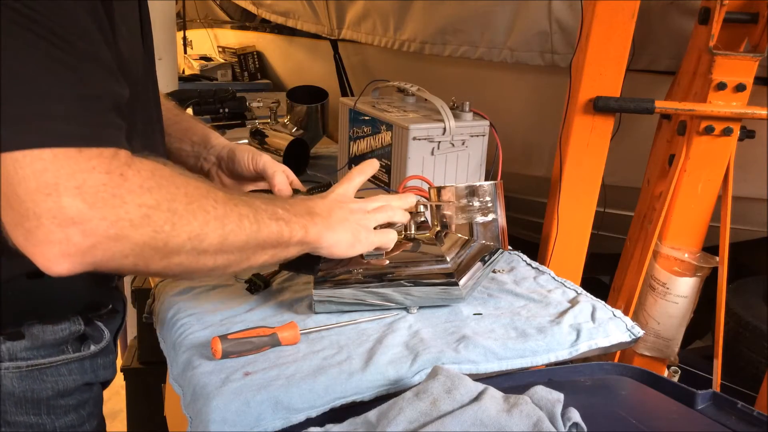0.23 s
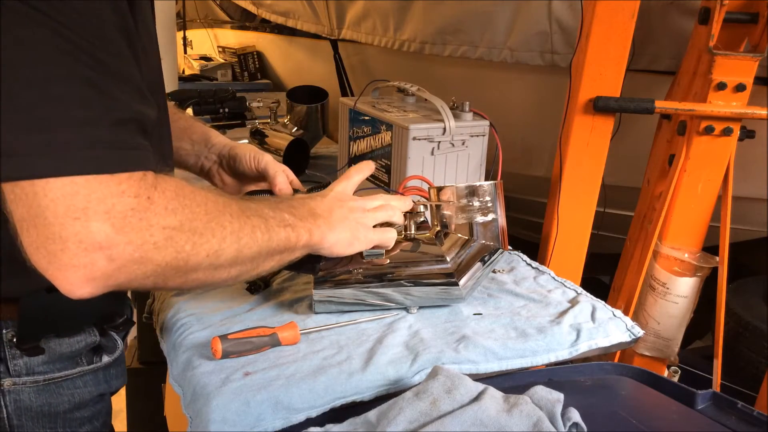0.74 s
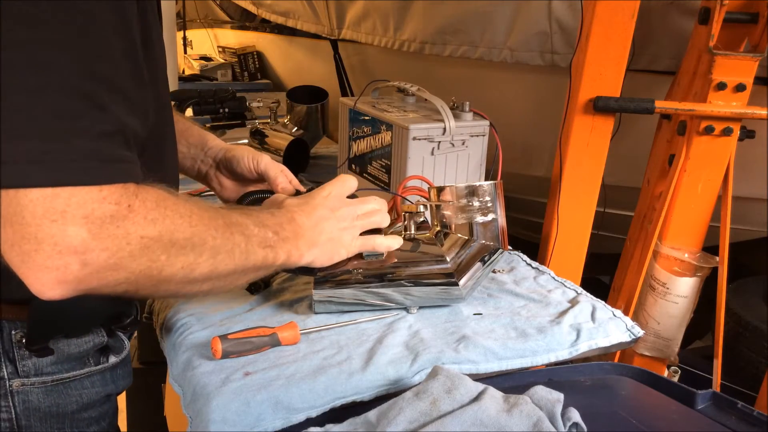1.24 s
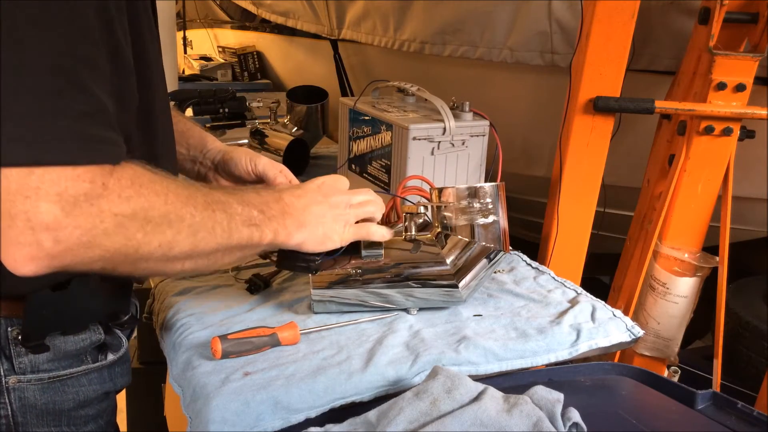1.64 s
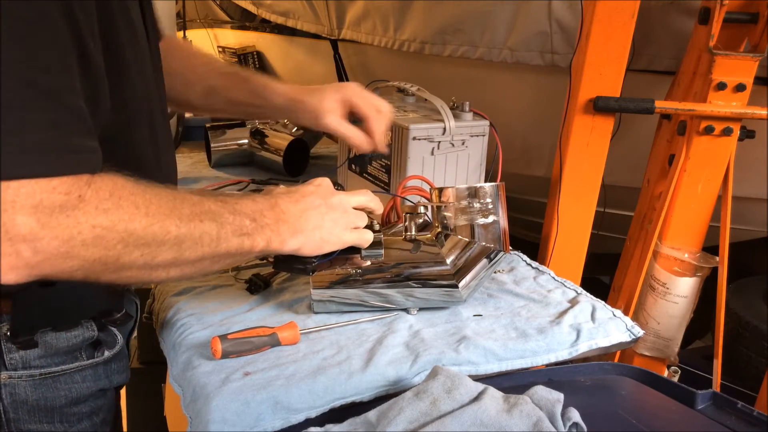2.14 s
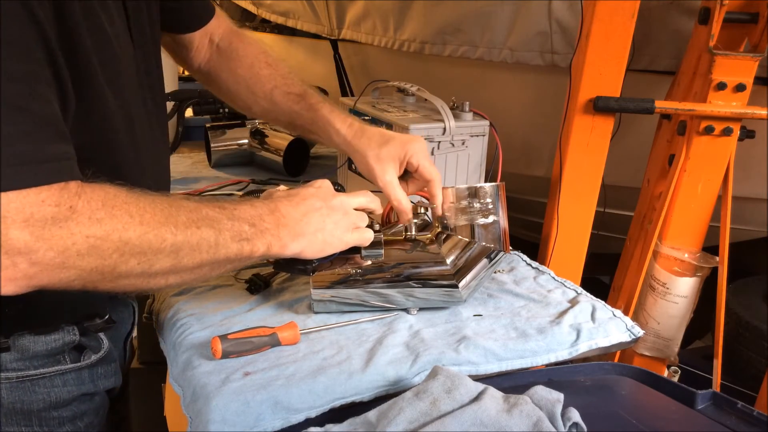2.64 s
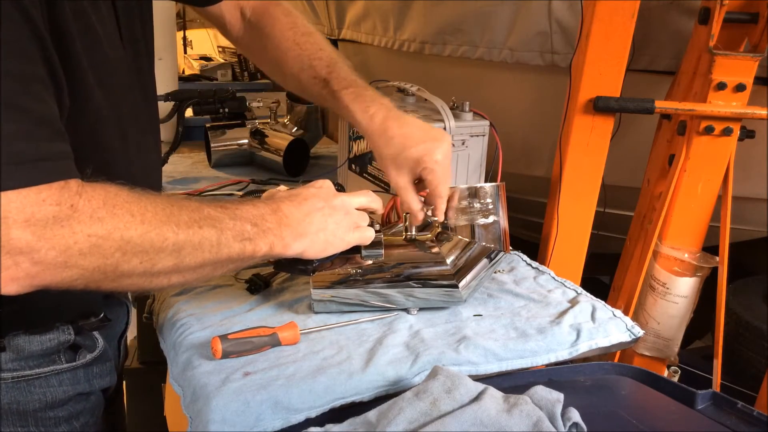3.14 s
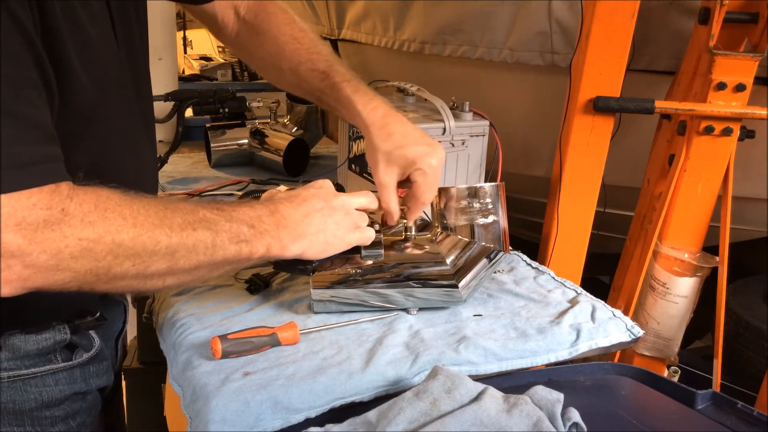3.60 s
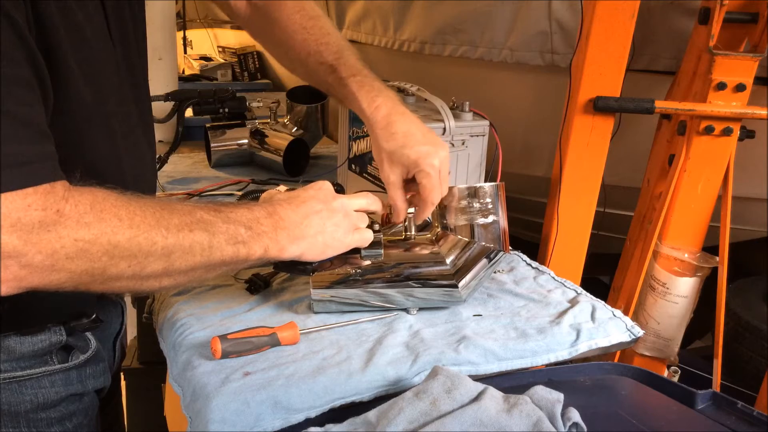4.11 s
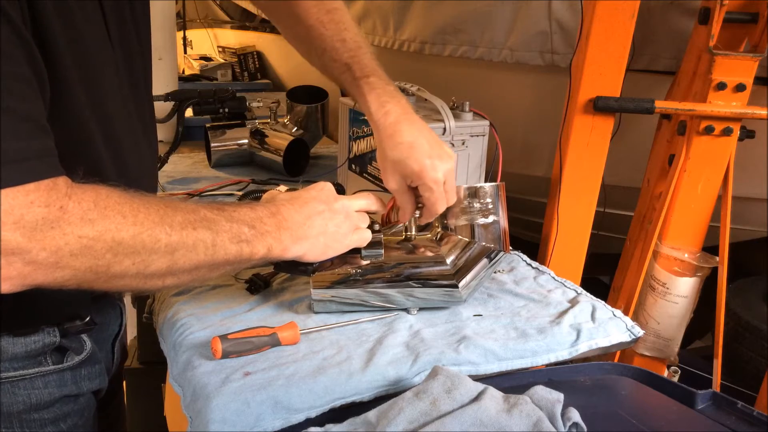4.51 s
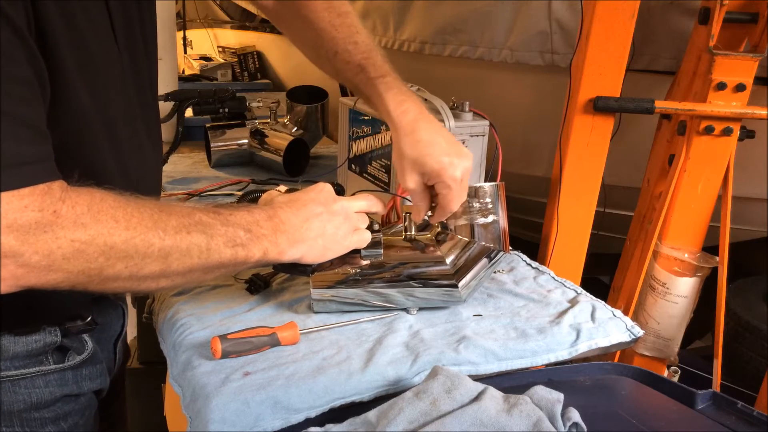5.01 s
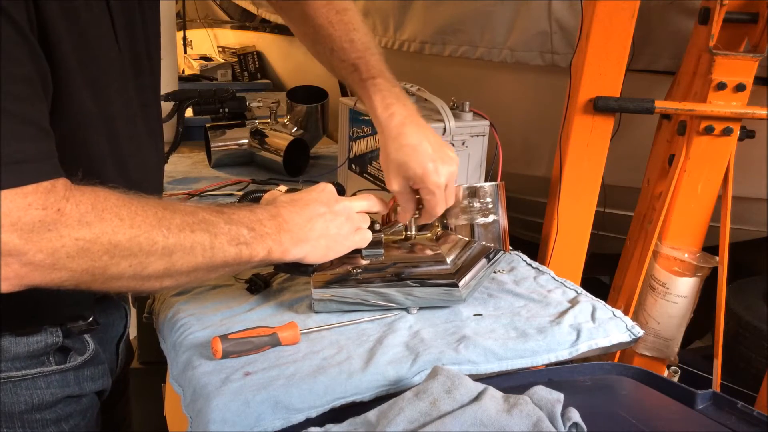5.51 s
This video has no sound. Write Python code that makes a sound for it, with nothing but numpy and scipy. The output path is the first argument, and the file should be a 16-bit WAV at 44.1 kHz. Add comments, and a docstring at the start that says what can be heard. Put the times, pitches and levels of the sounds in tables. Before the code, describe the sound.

A bright steel clip snaps and rings over a steady low fan hum, followed by dull metal knocks, tiny ticks and a late clack.

```python
"""First the steady hum and air rush of a fan motor in a small, cluttered shop, then light finger ticks.
At the workbench, straight ahead of the stereo microphones, a steel retaining clip snaps free and rings;
a part knocks twice on a metal valve housing, skin rubs faintly, and a fitting clacks into its seat.
Blows are noise bursts with a short echo plus decaying modes; rubs and air are coloured noise;
the hum is a 120 Hz mains tone with sine orders of the fan shaft, spread over left and right."""
import sys
import numpy as np
from scipy import signal
from scipy.fft import rfft, irfft
from scipy.io import wavfile

SR = 44100
rng = np.random.default_rng(int(sys.argv[2]) if len(sys.argv) > 2 else 0)


def put_to_file(sound):
    """Save the sound as 16-bit audio at rate SR, in the file named by the first command-line argument."""
    columns = np.atleast_2d(sound).T  # one column per channel
    safe = np.clip(columns, -1, 1)
    whole_steps = np.round(safe * 32767)
    wavfile.write(sys.argv[1], SR, whole_steps.astype(np.int16))


N = 253575  # length in samples
HIT_T = np.arange(SR // 2) / SR  # t/s since a blow
EARS = np.array([[.5], [-.5]])  # splits a left-minus-right difference over left and right

# Clip springing free and landing: t/s, level/dB, share that sets it ringing (0-1)
CLIP_HITS = [(0.3540, -17.5, 1), (0.3571, -24.5, 0), (0.3628, -27, 0.2)]
CLIP_MODES = [(1427, -37, .24), (2422, -33, .32), (2902, -46, .15), (3741, -27, .25), (4290, -45, .2),
              (4760, -38, .11), (5172, -37, .19), (5266, -29, .21), (5447, -26.5, .22), (6035, -39, .16),
              (7145, -29, .19), (7351, -37, .16), (7394, -21, .195), (7470, -37, .14), (8655, -27, .15),
              (8790, -37, .14), (9556, -27, .11), (9636, -22, .125), (9700, -17, .02), (10400, -39, .13),
              (10820, -40, .13), (11390, -41, .14), (12090, -32, .1), (12210, -33, .12), (12860, -32, .13),
              (13440, -39, .11), (14010, -40, .12), (14160, -39, .12), (14909, -33, .145)]
SNAP_COLOUR = [(500, -8.5), (1000, -22.5), (1330, 2), (1800, -15), (3200, -11), (3750, 7), (4250, -8.5),
               (5400, 4), (6400, -3), (9600, 4), (10800, -6), (12200, 5.5), (15000, -7), (15500, -57)]
CLIP_SCATTER = .45  # how strongly reflections make the ringing swell and dip (0-1)

# Touches (KNOCK_HITS, CLACK_HITS, TICK_HITS), columns: t/s, level/dB, brightness/dB per octave,
# ring level/dB relative to the loudest contact, number of contacts, change/dB per contact
# Dull knocks of a part on the housing: columns as above
KNOCK_HITS = [(1.4446, -33.5, 0, 3, 3, -1.5), (1.9016, -38.5, -1.9, -0.5, 3, -1)]
# Spectrum of a knock: f/Hz, density/dB per Hz
KNOCK_COLOUR = [(200, -11), (600, -4.5), (950, 4), (1400, -4.5), (2000, -7), (2520, -0.5), (3080, -10.5),
                (3750, -5.5), (4700, -14), (6100, -31), (7500, -8.5), (9000, -29), (10900, -20.5),
                (15000, -36)]
# Ringing modes of the housing: f/Hz, level/dB relative to the blow, T60/s
HOUSING_MODES = [(1025, -20, 0.33), (1350, -10.5, 0.17), (2330, -18, .13), (2454, -3, 0.073),
                 (2870, -25, 0.14), (3750, -10.5, 0.18), (4340, -24, 0.22)]
KNOCK_GAP_S, KNOCK_STRETCH = .0027, 2.1  # the part rocks: first gap between contacts, growth of the gaps

# Fitting scraping into its seat: columns as above
CLACK_HITS = [(4.823, -33, 1, 2, 4, -0.8)]
# Spectrum of the clack: f/Hz, density/dB per Hz
CLACK_COLOUR = [(200, -4), (480, 5), (950, -0.5), (1500, 5), (2200, -4), (3150, -1), (3800, -5.5),
                (5200, -5), (6000, -6.5), (8400, -8.5), (11000, -14), (14900, -26), (15500, -38)]
# Ringing modes of the fitting: f/Hz, level/dB relative to the blow, T60/s
FITTING_MODES = [(485, -7, 0.18), (3070, -8, 0.098), (3720, -23, 0.26), (4350, -19, .1), (4850, -17, 0.098),
                 (5350, -13, 0.12), (8032, -22, .1), (8320, -14, 0.14), (9360, -19, 0.13)]
CLACK_GAP_S, CLACK_STRETCH = .0019, 1.65  # it catches ever more slowly as it tightens

# Light ticks of small parts between the fingers: columns as above
TICK_HITS = [(0.2946, -43.5, 0.5, -2, 3, -4), (0.3235, -46, -2, 0, 3, -2), (2.8885, -48, 2, 6, 1, 0),
             (2.9203, -43, -2, 0, 3, -3.5), (3.0489, -48, -1.5, -2, 1, 0), (3.3007, -57.5, -3, 2, 4, 3),
             (3.3345, -50, -3.5, -3, 1, 0), (4.0210, -53, -5.5, 4, 1, 0), (4.0872, -52.5, -5.5, 4, 1, 0),
             (4.3480, -54, -2, 3.5, 2, 7), (4.4025, -52, 1, 4, 1, 0), (4.4186, -48.5, 2, 5, 1, 0)]
# Spectrum of a tick: f/Hz, density/dB per Hz
TICK_COLOUR = [(800, -6.5), (2200, 0.5), (3150, -1.5), (4100, -6), (5200, -2), (6250, 1.5), (7600, -6),
               (9000, -8), (11500, -11), (14000, -6), (14900, 2), (15500, -14)]
# Ringing modes of the small parts: f/Hz, level/dB relative to the blow, T60/s
TICK_MODES = [(3125, -11.5, 0.081), (3380, -12.5, 0.044), (6280, -6, 0.031), (14850, -18, .04)]
TICK_GAP_S, TICK_STRETCH = .008, .97  # a part slips under a fingertip: first gap, change of the gaps

# Fingertips sliding over metal: middle t/s, length/s, level/dB
RUB_STROKES = [(2.50, .25, -72), (2.74, .2, -73), (3.39, .08, -68), (5.23, .2, -66.5)]
# Spectrum of the rubbing: f/Hz, density/dB per Hz
RUB_COLOUR = [(1500, -13), (4000, -5), (7500, 0), (11000, -15), (15000, -6)]

# Echo decay of the shop: f/Hz, T60/s
SHOP_T60 = [(400, 0.26), (1500, 0.26), (4000, 0.21), (8000, 0.18), (15000, 0.18)]

FAN_HZ, MAINS_HZ = 45.67, 120  # shaft rate, mains hum
# Shaft orders of the fan: multiple of the shaft rate, level/dB rms, left minus right/dB, left lead/rad
FAN_ORDERS = [(1, -56.5, -4.5, -0.42), (3, -51.5, -2, 0.2), (4, -59, -4, 0.43), (5, -58.5, -1.5, 0.36),
              (7, -53, 5.5, 0.34)]
# Spectrum of the fan's air, before its peaks: f/Hz, density/dB per Hz
AIR_COLOUR = [(15, -4.5), (30, 2.5), (65, -4.5), (130, -3), (400, -4.5), (570, -3.5), (820, -11.5),
              (1150, -7), (1600, -16.5), (1900, -14.5), (2500, -21.5), (3700, -29), (8000, -31.5),
              (15000, -35.5)]
AIR_DB = -46.5  # rms level over both channels
# Narrow resonances in the air, a negative rise being a dip: f/Hz, width/Hz, rise/dB
AIR_PEAKS = [(568, 75, 5), (1225, 33, -2.5), (1449, 6.9, 15), (1796, 50, 9), (2056, 40, 0.5),
             (2623, 12, 14), (2965, 16, 7.5), (4340, 16, 15), (4910, 510, 4)]
# Likeness of the air at the left and right microphone: f/Hz, likeness (0-1)
AIR_SAME = [(60, 0.75), (130, 1), (290, 0.55), (520, 1), (700, 0.95), (860, 0.93), (1050, 0.95),
            (1700, 0.72), (2100, 0.62), (2700, 0.58), (3400, 0.079), (15000, .15)]
# Phase by which the left channel leads in the air: f/Hz, lead/rad
AIR_LEAD = [(45, 0.026), (130, 0.69), (340, 0.61), (520, -0.013), (750, 1.2), (1100, 0.48), (1600, 1.07),
            (2000, 0.61), (2700, 1.8), (6000, 1.1)]
# Balance of the air: f/Hz, left minus right/dB
AIR_PAN = [(60, 2.5), (110, -1), (200, 0), (380, 0.5), (700, -0.5), (1290, 1.5), (2380, 0.5), (4400, -1),
           (8120, 0.0), (15000, 0.5)]
EDGE_HZ = 15600  # upper band limit of the recorder


def clip_snap():
    """The spring clip lets go with a bright crack, rebounds and rings."""
    out = np.zeros(N)
    for s, db, share in CLIP_HITS:
        add(out, s, amp(db) * crack(SNAP_COLOUR, 0, t60=0.05, room_db=-10))
        add(out, s, share * ring(CLIP_MODES, CLIP_SCATTER))
    return out


def knocks():
    """A part rocks on the valve housing: dull contacts at widening gaps, and the housing rings."""
    return contacts(KNOCK_HITS, KNOCK_COLOUR, HOUSING_MODES, KNOCK_GAP_S, KNOCK_STRETCH,
                    t60=0.062, room_db=-10)


def clack():
    """A fitting catches in its seat ever more slowly, and each catch strikes it."""
    return contacts(CLACK_HITS, CLACK_COLOUR, FITTING_MODES, CLACK_GAP_S, CLACK_STRETCH,
                    t60=0.036, room_db=-11.5)


def ticks():
    """Small parts slip under the fingertips and catch at nearly even intervals."""
    return contacts(TICK_HITS, TICK_COLOUR, TICK_MODES, TICK_GAP_S, TICK_STRETCH,
                    t60=0.027, room_db=-10.5)


def contacts(rows, colour, modes, gap_s, stretch, t60, room_db):
    """Touches on a hand-damped part: every contact cracks, and the loudest one sets it ringing."""
    out = np.zeros(N)
    for s, db, tilt_db, ring_db, count, step_db in rows:
        delays, changes = chatter(count, step_db, gap_s, stretch)
        for delay, change in zip(delays, changes):
            add(out, s + delay, amp(db + change) * crack(colour, tilt_db, t60, room_db))
        loudest = changes.argmax()
        ringing = ring(tilted(modes, tilt_db), scatter=0.52)
        add(out, s + delays[loudest], amp(db + changes[loudest] + ring_db) * ringing)
    return out


def chatter(count, step_db, gap_s, stretch):
    """One touch breaks into contacts: their delays, gaps scaled by stretch, and steady level steps."""
    k = np.arange(round(count))
    gaps = gap_s * stretch ** k
    return np.cumsum(gaps) - gaps, step_db * k


def crack(colour, tilt_db, t60, room_db):
    """Dense, quickly dying vibration of a struck part, followed by the shop's short echo."""
    near, far = rng.choice([-1, 1], (2, len(HIT_T)))
    # the echo dies at its own rate in each frequency band
    f, t, bands = signal.stft(far, SR, nperseg=256)
    bands = bands * amp(-60 * t / read(SHOP_T60, f)[:, None])
    echo = signal.istft(bands, SR, nperseg=256)[1][:len(HIT_T)]
    echo = amp(room_db) * echo * (1 - np.exp(-HIT_T / 0.0042))  # builds up after the direct sound
    burst = near * amp(-60 * HIT_T / t60) + echo
    hz = np.fft.rfftfreq(len(HIT_T), 1 / SR)
    gain_db = read(colour, hz) + tilt_db * np.log2(np.maximum(hz, 400) / 3000)  # no tilt below 400 Hz
    mean_power_db = 10 * np.log10(np.mean(amp(gain_db) ** 2))
    return coloured(burst, gain_db - mean_power_db)


def ring(modes, scatter, scatter_hz=35):
    """A blow starts all modes in step; reflections arriving later make each swell and dip."""
    out = np.zeros(len(HIT_T))
    slow = np.exp(-(np.fft.fftfreq(len(HIT_T), 1 / SR) / scatter_hz) ** 2)
    for hz, db, t60 in modes:
        random_phases = np.exp(2j * np.pi * rng.random(len(HIT_T)))
        echoes = evened(np.fft.ifft(random_phases * slow))
        decay = amp(db - 60 * HIT_T / t60)
        swelling = decay * (1 + scatter * echoes * (1 - np.exp(-HIT_T / 0.013)))
        # swells move energy in time but add none
        swelling = swelling * np.linalg.norm(decay) / np.linalg.norm(swelling)
        out += (swelling * np.exp(2j * np.pi * hz * HIT_T)).imag
    return out * (1 - np.exp(-HIT_T / 0.0011))  # soft onset


def tilted(modes, tilt_db):
    """A brighter blow shifts the same energy towards the higher modes."""
    hz, db, t60 = np.transpose(modes)
    shifted = db + tilt_db * np.log2(hz)
    level_db = 20 * np.log10(np.linalg.norm(amp(db)) / np.linalg.norm(amp(shifted)))
    return zip(hz, shifted + level_db, t60)


def rubs(grain_db=3):
    """Skin slides on metal: a faint, grainy hiss that swells and fades with each stroke."""
    t, hz = np.arange(N) / SR, np.fft.rfftfreq(N, 1 / SR)
    grainy = rng.standard_normal(N) * amp(grain_db * drift(90))
    hiss = evened(coloured(grainy, read(RUB_COLOUR, hz)))
    strokes = sum(amp(db) * np.exp(-(2 * (t - s) / length) ** 2) for s, length, db in RUB_STROKES)
    return hiss * strokes


def hum(waver_db=0.2, wander=0.00058, mains_db=-56.5, mains_pan_db=4.0):
    """The fan shaft, slightly wandering in speed, sounds at its multiples beside the mains tone."""
    t = np.arange(N) / SR
    turns = np.cumsum(FAN_HZ * (1 + wander * drift(1))) / SR
    out = amp(mains_db + EARS * mains_pan_db) * np.sin(2 * np.pi * (MAINS_HZ * t + rng.random()))
    for order, db, pan_db, lead in FAN_ORDERS:
        phase = 2 * np.pi * (round(order) * turns + rng.random())
        level = amp(db + EARS * pan_db + waver_db * drift(5.9))
        out += level * np.sin(phase + EARS * lead)
    return np.sqrt(2) * out  # rms levels to sine peaks


def air():
    """Moving air makes a steady noise with narrow resonances, partly alike at the two microphones."""
    hz = np.fft.rfftfreq(N, 1 / SR)
    peaks_db = sum(db / (1 + (2 * (hz - f) / width) ** 2) for f, width, db in AIR_PEAKS)
    gain_db = read(AIR_COLOUR, hz) + peaks_db
    left, other = rfft(rng.standard_normal((2, N)))
    same = np.clip(read(AIR_SAME, hz), -1, 1)
    right = same * left + np.sqrt(1 - same ** 2) * other
    right = right * np.exp(-1j * read(AIR_LEAD, hz))
    spectra = np.array([left, right]) * amp(gain_db + EARS * read(AIR_PAN, hz))
    return amp(AIR_DB) * evened(irfft(spectra, N))


def coloured(x, gain_db):
    """Minimum-phase filter with the given gain per bin, so that nothing sounds before a blow."""
    log_gain = np.log(amp(np.concatenate([gain_db, gain_db[-2:0:-1]])))
    response = np.exp(np.conj(signal.hilbert(log_gain)))[:len(gain_db)]
    return irfft(rfft(x) * response, x.shape[-1])


def drift(hz):
    """Random fluctuation of rms 1, up to about hz."""
    f = np.fft.rfftfreq(N, 1 / SR)
    return evened(irfft(rfft(rng.standard_normal(N)) * np.exp(-(f / hz) ** 2), N))


def add(mix, s, sound):
    """Mixes a sound in at time s in seconds."""
    part = mix[round(s * SR):][:len(sound)]
    part += sound[:len(part)]


def read(points, hz):
    """Reads a table's second column at hz, interpolating on a log-frequency axis."""
    f, value = np.transpose(points)
    return np.interp(np.log(hz + 1), np.log(f + 1), value)


def evened(x):
    """Scales to rms 1."""
    return x / np.sqrt(np.mean(np.abs(x) ** 2) + 1e-20)


def amp(db):
    """Decibels to gain."""
    return 10 ** (np.asarray(db) / 20)


def scene():
    """Handling reaches both microphones alike, from straight ahead; hum and air differ left and right."""
    handling = clip_snap() + knocks() + clack() + ticks() + rubs()
    return handling + hum() + air()


def record(dry):
    """The recorder's band limit: a steep low-pass on both channels."""
    low_pass = signal.firwin(301, EDGE_HZ, window=("kaiser", 9), fs=SR)
    return signal.oaconvolve(dry, low_pass[None], "same")


dry = scene()
out = record(dry)
put_to_file(out)
```